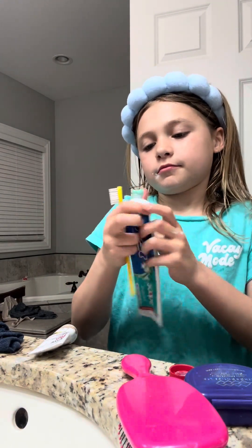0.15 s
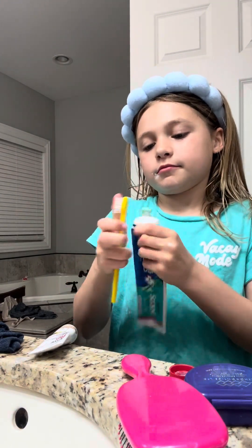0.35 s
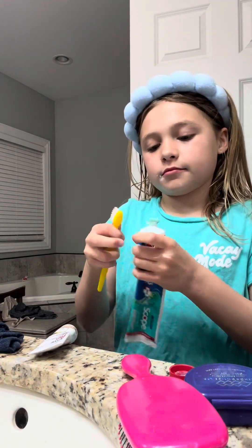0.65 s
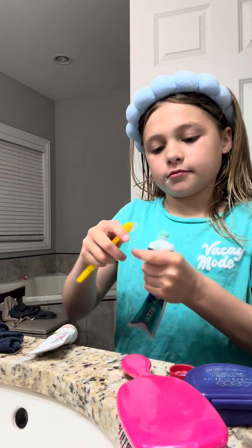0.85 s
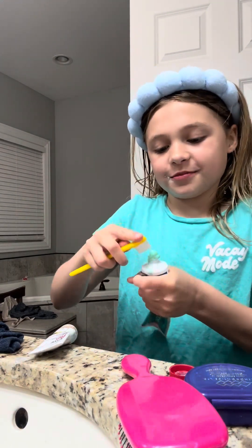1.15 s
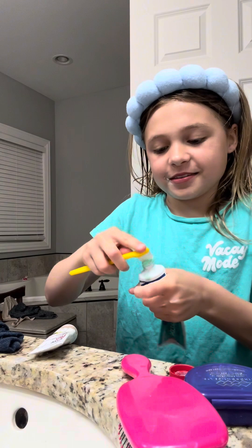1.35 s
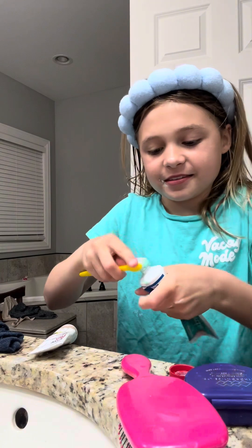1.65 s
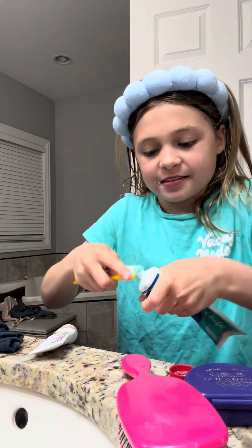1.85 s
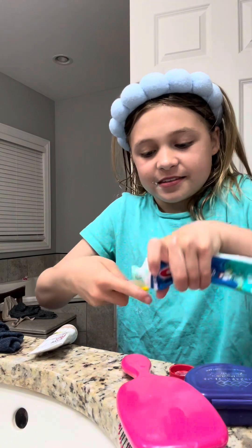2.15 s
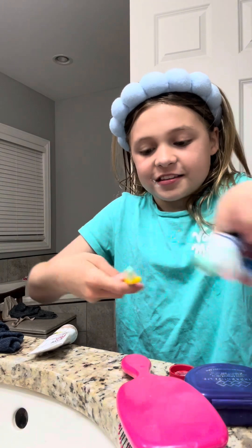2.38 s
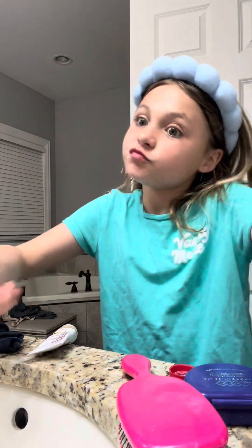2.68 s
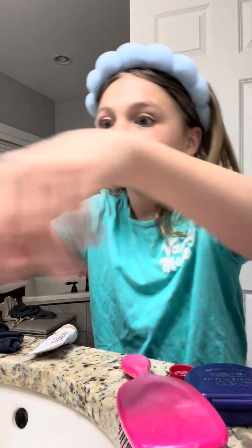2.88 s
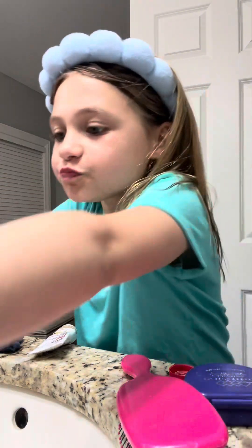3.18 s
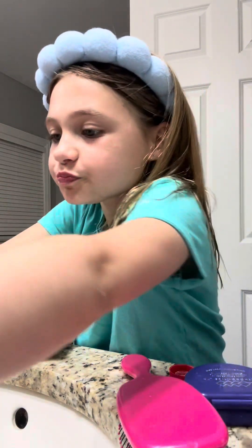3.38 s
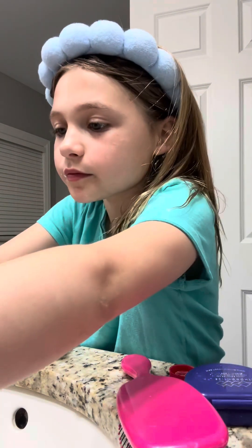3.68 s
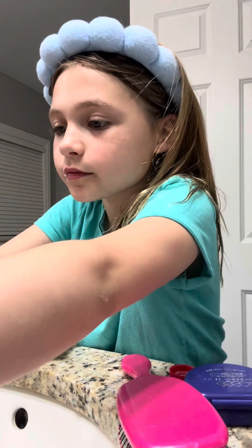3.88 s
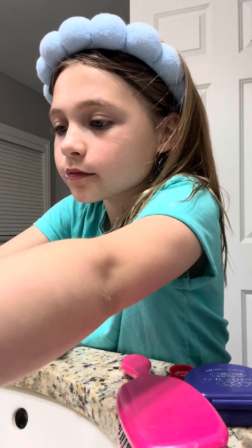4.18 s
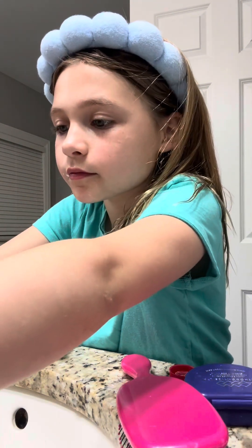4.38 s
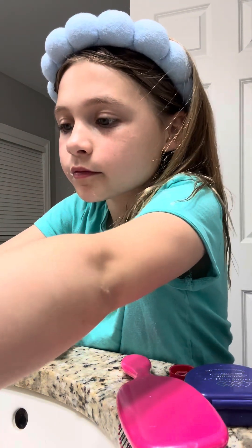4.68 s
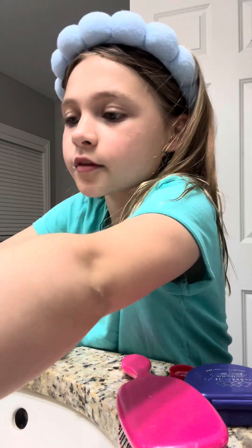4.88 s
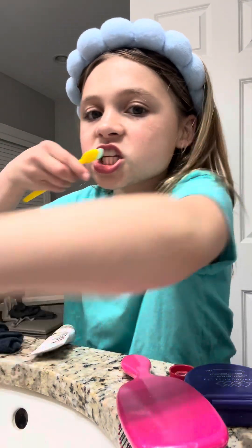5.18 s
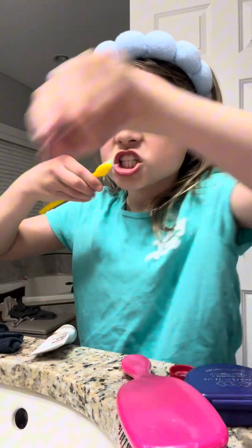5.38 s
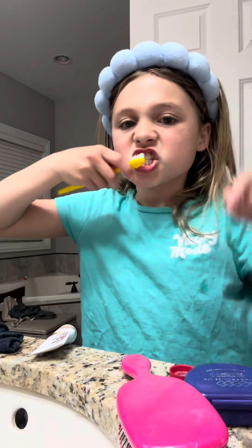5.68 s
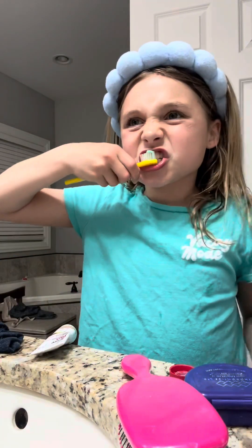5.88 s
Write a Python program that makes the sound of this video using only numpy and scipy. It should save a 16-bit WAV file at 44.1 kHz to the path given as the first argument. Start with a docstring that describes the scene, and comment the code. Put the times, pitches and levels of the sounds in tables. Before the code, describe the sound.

Faint plastic rustles and ticks, a heavy tube drop with rattling bounces, a short hissing tap burst, handle clunk, drips and a first toothbrush scrape.

```python
"""Tube dropped in a bathroom

A small hard bathroom with a humming fan, heard through the two ports of a microphone. Fingers rustle and tick on
a plastic tube: grains and gliding bands of noise, short pings. The tube drops on the stone counter and clatters to
rest: bursts of force ring its modes over low booms. A tap runs for a moment as coloured noise into a drain that
gulps on two tones; it is shut and drips, and a brush meets the teeth in bright grains."""
import sys
import numpy as np
from scipy import signal
from scipy.fft import rfft, irfft
from scipy.io import wavfile

SR = 44100
rng = np.random.default_rng(int(sys.argv[2]) if len(sys.argv) > 2 else 0)


def wav_record(signal):
    """Record a signal, one row per channel, as 16-bit PCM in the file named by sys.argv[1]."""
    frames = np.transpose(np.atleast_2d(signal))
    bounded = np.clip(frames, -1, 1)
    # unit amplitude maps onto the largest positive 16-bit level
    quanta = np.round(bounded * 32767).astype(np.int16)
    wavfile.write(sys.argv[1], SR, quanta)


N = 265923
HZ = np.maximum(np.fft.rfftfreq(N, 1 / SR), 1)
TIME = np.arange(N) / SR

# In all spectra and mode lists the levels are relative to each other unless noted.
# broad fan air: pitch_hz, density_db (per Hz)
FAN_AIR = [(35, 4), (55, -7.5), (120, -9), (160, -14), (205, -16), (260, -15.5), (340, -9), (420, -16.5),
           (560, -25.5), (820, -29.5), (1200, -30), (2000, -40.5), (6000, -53.5), (9000, -74.5)]
# loudness of the fan air: start_s, level_db
FAN_AIR_LEVEL = [(0, -53.5), (2.4, -54.5), (3.2, -50.5), (6.03, -54.5)]
# wavering fan lines: pitch_hz, width_hz, level_db
FAN_HUM = [(60, 2.416, -60.5), (123, 3, -70), (204.6, 8, -67), (362.7, 19, -63.5), (588, 6.6, -81)]
# how the ports hear the fan, rustles, brush and hiss, three lists:
# pitch_hz, left_right_db / pitch_hz, likeness (0 to 1) / pitch_hz, left_lead_rad
AIR_PORTS = ([(60, -1), (150, -6), (350, -8), (650, -1), (1400, -5), (3200, -9), (7000, -4), (13000, 0)],
             [(60, .85), (150, .6), (350, .7), (700, .4), (1400, .2), (3000, .3), (7000, .5), (13000, .5)],
             [(50, -1.3), (200, -1.1), (350, -.2), (700, -.6), (1400, .8), (3000, 2.8), (7000, -.3),
             (13000, 1.1)])

# rustles and rubs of hands and tube, and fizz after bright ticks: start_s, length_s, cloth_db, rub_db
RUSTLES_AND_RUBS = [(0.0, 0.07, -86, -80), (0.166, 0.037, -83.5, -78), (0.26, 0.21, -102, -78),
                    (0.324, 0.11, -74.5, -77.5), (0.543, 0.15, -96, -75.5), (0.63, 0.063, -81, -78),
                    (0.784, .005, -79.5, -80), (0.85, 0.055, -99, -79), (1.057, 0.021, -77, -73),
                    (1.129, 0.022, -74, -87), (1.452, 0.023, -77, -87), (1.423, 0.13, -104, -84),
                    (1.855, 0.083, -87, -78), (2.226, 0.13, -92, -88), (2.342, 0.034, -65.5, -75),
                    (2.436, 0.037, -57.5, -65.5), (2.547, 0.37, -65, -60), (2.72, 0.056, -58, -56.5),
                    (2.844, 0.11, -71, -65.5), (3.006, 0.088, -68.5, -64), (3.115, 0.15, -79, -72),
                    (4.759, 0.037, -58, -76), (4.805, 0.031, -76, -74), (4.837, 0.03, -57, -98),
                    (4.9, 0.043, -59.5, -98.5), (4.982, 0.037, -70.5, -103), (5.772, 0.096, -84.5, -84.5)]
# spectrum of the cloth-like rustle: pitch_hz, density_db (per Hz)
CLOTH_SPECTRUM = [(2940, -31), (5000, -16), (5460, -13), (7860, -3), (9320, -5.5), (10100, -25), (13600, 0),
                  (16000, -28)]
# tube wall under a finger: pitch_hz, width_hz, level_db
RUBBED_WALL = [(1720, 760, 4.5), (2820, 760, 2.5), (3500, 960, -2.5), (4600, 2400, 1.5), (6300, 1100, -8.5)]
CLOTH_RISE_DB_PER_S, CLOTH_FALL_DB_PER_S = 3000, 299.5
RUB_RISE_DB_PER_S, RUB_FALL_DB_PER_S = 403.5, 197.5
# a finger sliding along the tube wakes one band of its wall: start_s, length_s, from_hz, to_hz, level_db
FINGER_SLIDES = [(0.173, .05, 1900, 1900, -77.5), (0.238, .07, 2776, 2665, -70),
                 (0.306, 0.21, 2540, 2785, -72.5), (.32, 0.12, 6400, 6200, -78),
                 (0.327, 0.025, 7500, 7600, -77), (0.341, 0.18, 4780, 4600, -74.5),
                 (.36, .015, 7400, 8000, -87), (.55, .15, 4700, 4400, -87), (0.858, 0.05, 4230, 4500, -84),
                 (1.06, 0.031, 2960, 2800, -90), (1.435, 0.11, 4500, 4600, -86),
                 (1.471, 0.097, 2830, 2730, -81.5)]
SLIDE_WIDTH_HZ = 330

# dull thuds through the counter: start_s, boom_db, boom_hz, knock_db, decay_s
COUNTER_THUDS = [(0.236, -37, 60, -57, 0.014), (2.445, -16, 75.4, -21, 0.035),
                 (2.502, -33, 151, -69, 0.015), (2.602, -40.5, 338, -27, 0.12),
                 (2.612, -22.5, 71.5, -55, 0.029), (2.682, -35.5, 133, -39, 0.024),
                 (2.726, -27, 174, -34.5, 0.02), (2.758, -38, 127.4, -39.5, 0.079),
                 (2.852, -43.5, 338, -43.5, 0.0292), (2.889, -33, 100, -45.5, 0.041),
                 (3.103, -43.5, 130.2, -52.5, 0.09), (3.249, -46.5, 71.4, -74, 0.04),
                 (3.36, -45.5, 60, -64.5, 0.035), (3.668, -34, 123, -64, 0.016),
                 (4.06, -45, 120.4, -75, 0.024), (4.775, -45, 334, -70, 0.012),
                 (4.798, -27.5, 119, -67, 0.043), (4.814, -39, 258, -42, 0.035),
                 (4.857, -38.5, 147.7, -54, 0.029)]
# modes of the counter top: pitch_hz, level_db, t60_s
COUNTER_MODES = [(374, -20.5, 0.021), (407, -4, 0.11), (490, 7.5, 0.022), (693.4, -6.5, 0.067),
                 (910, -5, 0.017), (1560, -13, 0.038), (1900, -15, 0.04)]
# loose things shaking with each boom: pitch_hz, density_db (per Hz)
RUMBLE_SPECTRUM = [(40, -16.5), (80, 6.5), (250, -4.5), (400, -8.5), (700, -30.5), (2500, -38.5),
                   (6000, -60)]
RUMBLE_DB = -6.5  # rms beside a boom tone of height 1
BOOM_LAG_S = .006  # the boom begins this long after the listed time of the thud
BOOM_SWELL_CYCLES, BOOM_FALL_POWER = 1.3, 1.2  # a power above 1: the boom holds, then drops

# small ticks of fingers, drops and brush: start_s, peak_db, pitch_hz, treble_edge_db (beside the ping), ring_cycles
SMALL_TICKS = [(0.676, -47.5, 836, -30, 2.7), (0.675, -54, 1900, -30, 3.5), (0.7888, -60.5, 3380, -10, 18),
               (1.048, -54, 4600, -3, 10.6), (1.048, -53.5, 8000, -27, 30), (1.049, -56.5, 910, -28, 16),
               (1.4494, -59, 8400, -11, 9.4), (1.05, -51, 2310, -30, 2.5), (1.056, -51.5, 2800, -20, 3.8),
               (1.897, -64, 7000, 3, 1.4), (2.304, -53.5, 8400, -14, 16), (2.3421, -41.5, 8000, -12, 11),
               (2.342, -54.5, 2970, -28, 12), (2.427, -49.5, 2550, -22, 6.3), (2.5394, -37, 7590, -12, 4.6),
               (3.8072, -51.5, 3840, 7, 27), (3.889, -58.5, 3800, -20, 18), (3.804, -47, 5700, 3, 10),
               (3.8888, -34.5, 8000, 2, 8.5), (3.951, -55, 2730, -5, 26), (4.629, -51, 5900, -15, 11),
               (4.69, -52.5, 9080, 10.5, 5), (4.74, -57.5, 8580, 1, 8.4), (4.7616, -37.5, 8860, -3, 25),
               (4.771, -42, 8350, -9, 9.9), (4.772, -59, 5100, -20, 13), (4.786, -60.5, 6100, -20, 12),
               (4.823, -62.5, 3960, -18, 18), (4.8424, -31, 7980, -5, 17), (4.9037, -31.5, 8120, -8, 11),
               (4.9462, -57, 3500, -10, 26), (4.977, -61.5, 5200, 6.5, 19), (5.024, -68, 5050, -17, 16),
               (5.0756, -57, 7890, -3, 7.5), (5.098, -63, 8000, 2, 5.9), (5.842, -60.5, 1714, -21, 7.9),
               (5.8622, -63, 7460, -2, 5), (5.9698, -36, 7140, -15, 16)]
# side a tick is heard on, by pitch: pitch_hz, left_right_db
TICK_PAN = [(800, -8), (1800, -15), (3500, -19.5), (5200, -25), (7000, -15), (9000, 3)]
TICK_EDGE_HZ = 13500

# tube on the counter, force felt by each part and the pitch each spot favours:
# start_s, body_db, wall_db, cap_db, wall_hz, cap_hz
TUBE_BOUNCES = [(2.442, -51.5, -44.5, -48.5, 2200, 5900), (2.5674, -23, -66, -55.5, 3200, 6600),
                (2.571, -36.5, -38, -27, 3700, 5700), (2.6005, -4, -43, -38.5, 2200, 8000),
                (2.6119, -44.5, -52, -32.5, 5150, 8000), (2.617, -46, -48.5, -49.5, 3650, 7300),
                (2.618, -48, -57.5, -43.5, 4470, 6610), (2.656, -55.5, -44.5, -35, 2730, 5900),
                (2.681, -41, -45.5, -38, 3670, 6300), (2.7242, -21, -53, -36.5, 3950, 6860),
                (2.7399, -28, -49, -37, 2727, 5900), (2.762, -37, -48.5, -54.5, 2400, 8300),
                (2.851, -27, -40, -63, 3240, 6300), (2.863, -29.5, -88, -41.5, 2205, 6370),
                (2.887, -37.5, -103, -67, 2200, 6600), (3.033, -33, -50, -46.5, 2170, 5960),
                (3.092, -43, -64, -88, 3180, 6580)]
# modes of the tube's body, then wall, then cap: pitch_hz, level_db, t60_s
TUBE_BODY = [(900, -19, 0.035), (1115, -1, 0.009), (1180, -8.5, 0.00077), (1264, -10, 0.027),
             (1510, -10, 0.013), (1840, -8, 0.013)]
TUBE_WALL = [(2200, -5, 0.0044), (2730, -2, 0.006), (3200, 0.5, 0.0039), (3650, -1.5, 0.0056),
             (4400, -1, 0.0047), (5150, 3, 0.0055)]
TUBE_CAP = [(5900, -8, .003), (6600, -5, 0.002), (7300, -3.5, 0.0033), (8000, 1, 0.0029),
            (9170, 2.5, 0.0027), (11400, -1.5, .002), (13600, 1.5, .002), (15200, -9, .002)]
RING_DELAY_S = .0015  # the ringing of a blow begins this long after its listed time
FAVOUR_DB, FAVOUR_OCTAVES = 11.5, 0.39  # lift of the modes near a favoured pitch
CHATTER_DECAY_S = .002
FIRST_TOUCH, LATER_TOUCHES = 1.9, .9  # sizes within the chatter of one bounce
# the tube shivers against the stone between bounces: start_s, length_s, level_db
TUBE_SHIVERS = [(2.474, 0.043, -61), (2.567, .05, -49), (2.63, 0.087, -56.5), (2.732, .04, -54.5),
                (2.854, .04, -65), (3.03, 0.02, -72)]
SHIVERS_PER_S, SHIVER_FALL_DB_PER_S = 300, 250.5
# how the ports hear the blows, two lists: pitch_hz, left_right_db / pitch_hz, left_lead_rad
HIT_PORTS = ([(60, 0), (150, -1), (350, 0), (650, 0), (1300, 2), (2200, -6), (4000, -11), (8000, -2),
             (13000, 0)], [(60, -.5), (150, -1.4), (690, -2.0), (1200, .3), (1550, .8), (2150, -2.4),
             (2500, -2.3), (5000, 4.7), (6500, 5.8), (8000, 7.6), (11200, 10.4), (13600, 14.5),
             (16000, 16)])

# water on the basin: pitch_hz, density_db (per Hz)
BASIN_SPECTRUM = [(350, -66), (600, -39.5), (650, -29), (910, -13.5), (1460, 0.5), (1790, -13),
                  (2110, -12.5), (3440, -25.5), (3730, -32), (5000, -21), (6500, -57), (11000, -120)]
# hiss of the aerator: pitch_hz, density_db (per Hz)
AERATOR_SPECTRUM = [(3000, -17.5), (4600, -16.5), (6900, -7.5), (8000, -4.5), (9500, 4), (10300, -68),
                    (11200, -2.5), (13600, -0.5), (14800, -1.5), (15800, -22), (16400, -28)]
# the tap's narrow wavering resonances: pitch_hz, width_hz, level_db
TAP_WHISTLES = [(1000, 32, -78), (1307, 25, -67.5), (1440, 60, -67.5), (1935, 46, -73), (2145, 40, -72.5),
                (2800, 23, -80.5), (6100, 49, -74), (6800, 70, -71.5), (7440, 50, -76), (8070, 71, -66.5),
                (8370, 29, -67.5), (9160, 51, -65), (12230, 92, -72), (13100, 72, -65), (13700, 110, -74)]
# how the ports hear the tap, three lists:
# pitch_hz, left_right_db / pitch_hz, likeness (0 to 1) / pitch_hz, left_lead_rad
TAP_PORTS = ([(60, 6), (130, 14), (290, 45), (640, -4), (1410, 9.5), (3100, -2.5), (6820, -4), (15000, 2)],
              [(700, 0.16), (1400, 0.054), (3000, 0.084), (7000, 0.23), (13000, 0.63)], [(700, -4.5),
              (1400, 1.93), (7000, 1.24), (13000, 0)])
TAP_OPEN_S, TAP_SHUT_S = 3.40, 4.576  # fully open from, until
WATER_DB, WATER_SWELL_DB_PER_S, WATER_FALL_DB_PER_S = -57.5, 218.5, 160
AERATOR_DB, AERATOR_SWELL_DB_PER_S, AERATOR_FALL_DB_PER_S = -53, 622, 165  # level as the tap is fully open
AERATOR_SAG_DB_PER_S = 1
WHISTLE_FALL_DB_PER_S, WHISTLE_FLICKER_DB = 350, 4
WHISTLE_WANDER, WHISTLE_SAG_PER_S = 0.0091, .015  # shares of pitch

# gulps of the drain as water first reaches it: start_s, length_s, low_tone_db, high_tone_db
DRAIN_GULPS = [(3.663, 0.069, -52, -52.5), (3.8, 0.0043, -42.5, -43.5), (3.842, 0.062, -45.5, -58),
               (3.943, 0.0027, -70, -39), (4.02, 0.033, -54.5, -53)]
DRAIN_LOW_HZ, DRAIN_HIGH_HZ = 209, 335
GULP_RISE_S, GULP_FALL_DB_PER_S = .01, 400  # the rise covers 20 dB

# modes of the tap handle: pitch_hz, level_db, t60_s
HANDLE_MODES = [(334, -3, 0.025), (551, 5.5, 0.027), (997, -2.5, 0.025), (1260, -3, 0.012),
                (1485, -7, 0.02)]
HANDLE_STOP_S, HANDLE_STOP_DB = 4.794, -36.5  # the handle meets its stop

# bands of the bristles: pitch_hz, width_hz, level_db
BRISTLE_BANDS = [(4500, 1200, -13), (6800, 1600, 1), (8300, 1250, -6), (11670, 1500, -10)]
BRUSH_S, BRUSH_DB = 5.972, -66  # bristles start to scrub

# tails of the bathroom: pitch_hz, t60_s, level_db
ROOM_TAILS = [(100, 0.8, -9), (376, 0.54, -9.5), (1300, 0.21, -5.5), (3500, 0.33, -4), (8000, 0.48, -12),
              (13000, 0.274, -32.5)]
TICK_WET_DB = -8  # send of ticks and handle to the room

# steady microphone hiss: pitch_hz, density_db (per Hz)
MIC_HISS = [(2350, -35.5), (4000, -18), (8650, -4.5), (10600, -23), (11300, -11), (13700, 1),
            (15100, -16.5), (16000, -28)]
MIC_HISS_DB = -85
MONO_FROM_S, MONO_BELOW_HZ = 3.0, 342
BASS_CUT_HZ, CUTOFF_HZ = 42, 16900


def from_db(db):
    """Amplitude ratio of a level in dB."""
    return 10 ** (np.asarray(db) / 20)


def rms_one(x):
    """The same sound at rms 1."""
    return x / np.sqrt(np.mean(x ** 2) + 1e-20)


def at_hz(points, hz=HZ, axis=1):
    """A column joined by straight lines over log frequency."""
    points = np.array(points)
    return np.interp(np.log(hz), np.log(points[:, 0]), points[:, axis])


def drift(rate_hz):
    """Slow chance of spread 1; slow rates are drawn at every 16th sample."""
    step = 16 if rate_hz < 60 else 1
    r = np.exp(-2 * np.pi * rate_hz * step / SR)
    noise = rng.standard_normal((N + SR) // step + 2)
    slow = signal.lfilter([1], [1, -2 * r, r * r], noise)[SR // step:]  # the filter's start-up is dropped
    return np.interp(np.arange(N) / step, np.arange(len(slow)), rms_one(slow))


def hold(start, length, rise_db_per_s, fall_db_per_s):
    """Gain that swells up to the start, holds and dies away; silent below -60 dB."""
    rise_db = rise_db_per_s * (TIME - start)
    fall_db = fall_db_per_s * (start + length - TIME)
    db = np.minimum(0, np.minimum(rise_db, fall_db))
    gain, heard = np.zeros(N), db > -60
    gain[heard] = from_db(db[heard])
    return gain


def ring(clicks, hz, t60):
    """A unit click sets a sine of starting height 1 ringing, down 60 dB after t60 seconds."""
    r, w = from_db(-60 / (t60 * SR)), 2 * np.pi * hz / SR
    return signal.lfilter([0, np.sin(w)], [1, -2 * r * np.cos(w), r * r], clicks + 1e-18)


def double_ring(force, hz, t60):
    """Twice through one resonance: a soft, compact ping that swells before it dies; peak 1."""
    ping = ring(ring(force, hz, t60), hz, t60)
    return ping / np.abs(ping).max()


def humps(peaks):
    """Gain over frequency of a sum of resonances, whose total levels stand as listed."""
    return np.sqrt(sum(from_db(2 * db) / width / (1 + (2 * (HZ - hz) / width) ** 2) ** 2
                       for hz, width, db in peaks))


def at_ports(x, balance, lead):
    """One sound as the left and right port hear it, apart in level and phase."""
    tilt = from_db(at_hz(balance) / 2) * np.exp(.5j * at_hz(lead))
    return irfft(rfft(x) * np.array([tilt, 1 / tilt]), N)


def port_noise(gain, ports, source=None):
    """Coloured noise, partly shared by the ports; rms 1."""
    balance, likeness, lead = ports
    shared = rng.standard_normal(N) if source is None else source
    alike = np.clip(at_hz(likeness), 0, 1)
    tilt = from_db(np.outer([.5, -.5], at_hz(balance)))
    own = rfft(rng.standard_normal((2, N))) * np.sqrt(1 - alike) * tilt
    common = np.sqrt(alike) * rfft(at_ports(shared, balance, lead))
    return rms_one(irfft(gain * (common + own), N))


def band_noise(hz, width_hz):
    """A narrow band of noise around a centre that may move."""
    turn = 2 * np.pi * np.cumsum(hz * np.ones(N)) / SR
    return drift(width_hz) * np.cos(turn) + drift(width_hz) * np.sin(turn)


def grains(per_s, spread_db):
    """Random clicks of uneven size; rms 1."""
    sizes = from_db(spread_db * np.minimum(rng.exponential(1, N), 5)) * rng.choice([-1, 1], N)
    return rms_one(sizes * (rng.random(N) < per_s / SR))


def strike(modes, times, levels_db, contacts, favoured_hz=None):
    """Each contact, a short burst of force, rings every mode with a strength of its own."""
    out, luck_db = np.zeros(N), rng.normal(0, 1.2, (len(times), len(modes)))
    if favoured_hz is not None:
        octaves = np.log2(np.array(modes)[:, 0] / favoured_hz[:, None])
        luck_db = luck_db + FAVOUR_DB * np.exp(-(octaves / FAVOUR_OCTAVES) ** 2)
    for k, (hz, db, t60) in enumerate(modes):
        force = np.zeros(N)
        for s, level_db, contact, chance_db in zip(times, levels_db, contacts, luck_db[:, k]):
            i = round((s + RING_DELAY_S) * SR)
            force[i:i + len(contact)] += from_db(level_db + db + chance_db) * contact[:N - i]
        sign = 1 if favoured_hz is None else (-1) ** k  # neighbouring modes of wall and cap in opposite sense
        out += sign * ring(force, hz, t60)
    return out


def fan():
    """Broad air noise and hum lines that waver because each is a narrow band of noise."""
    hum_level = np.sqrt(np.sum(from_db(2 * np.array(FAN_HUM)[:, 2])))
    hum = hum_level * port_noise(humps(FAN_HUM), AIR_PORTS)
    air_db = np.interp(TIME, *np.transpose(FAN_AIR_LEVEL))
    return from_db(air_db) * port_noise(from_db(at_hz(FAN_AIR)), AIR_PORTS) + hum


def rustle():
    """Dense soft grains for rustle, rattle and fizz, and a dull rub coloured by the tube wall."""
    cloth_gain = sum(from_db(db) * hold(s, length, CLOTH_RISE_DB_PER_S, CLOTH_FALL_DB_PER_S)
                     for s, length, db, _ in RUSTLES_AND_RUBS)
    rub_gain = sum(from_db(db) * hold(s, length, RUB_RISE_DB_PER_S, RUB_FALL_DB_PER_S)
                   for s, length, _, db in RUSTLES_AND_RUBS)
    flutter = from_db(3.9 * drift(54))
    cloth = port_noise(from_db(at_hz(CLOTH_SPECTRUM)), AIR_PORTS, grains(4100, 1.5))
    rub = port_noise(humps(RUBBED_WALL), AIR_PORTS, grains(2500, 4.0))
    return cloth_gain * flutter * cloth + at_ports(slides(), *AIR_PORTS[::2]) + rub_gain * rub


def slides():
    """A finger along the wall: a soft band of noise that glides while the finger moves."""
    out = np.zeros(N)
    for s, length, from_hz, to_hz, db in FINGER_SLIDES:
        glide_hz = np.interp(TIME, [s, s + length], [from_hz, to_hz])
        gain = from_db(db) * hold(s, length, RUB_RISE_DB_PER_S, RUB_FALL_DB_PER_S)
        out += gain * band_noise(glide_hz, SLIDE_WIDTH_HZ)
    return out


def thuds():
    """A low, lumpy boom that swells and dies, a rumble along with it and a knock of the counter top."""
    s, boom_db, hz, knock_db, decay_s = np.transpose(COUNTER_THUDS)
    shaking = rfft(grains(1200, 2.0)) * from_db(at_hz(RUMBLE_SPECTRUM))
    rumble = from_db(RUMBLE_DB) * rms_one(irfft(shaking, N))
    booms = np.zeros(N)
    for start, level_db, boom_hz, fall_s in zip(s, boom_db, hz, decay_s):
        t = np.maximum(TIME - start - BOOM_LAG_S, 0)
        swell = 1 - np.exp(-t * boom_hz / BOOM_SWELL_CYCLES)
        fall = np.exp(-(t / max(fall_s, .005)) ** BOOM_FALL_POWER)
        booms += from_db(level_db) * swell * fall * (np.sin(2 * np.pi * boom_hz * t) + rumble)
    contact = np.hanning(20) / 10
    knocks = strike(COUNTER_MODES, s, knock_db, [contact] * len(s))
    lumps = from_db(1.0 * drift(40))
    return booms * lumps + knocks


def ticks():
    """A short ping that swells and dies on its own pitch, with a bright edge, placed left or right."""
    out, t = np.zeros((2, N)), np.arange(900) / SR
    chatter = rng.standard_normal((len(SMALL_TICKS), 900)) * np.exp(-t / 0.004) * 0.035
    chatter[:, 0] = 1  # the first touch
    for (s, peak_db, hz, edge_db, cycles), force in zip(SMALL_TICKS, chatter):
        ping = double_ring(force, hz, max(cycles, 1) / hz)
        ping = ping + from_db(edge_db) * double_ring(force, TICK_EDGE_HZ, 0.0013)
        sides_db = peak_db + np.array([[.5], [-.5]]) * at_hz(TICK_PAN, hz)
        i = round(s * SR)
        out[:, i:i + 900] += (from_db(sides_db) * ping)[:, :N - i]
    return out


def clatter():
    """Each bounce flexes the body to and fro; wall and cap feel a swelling, dying chatter of small touches."""
    s, body_db, wall_db, cap_db, wall_hz, cap_hz = np.transpose(TUBE_BOUNCES)
    t = np.arange(600) / SR
    envelope = np.exp(-t / CHATTER_DECAY_S) * (1 - np.exp(-t / 0.00014))
    chatter = LATER_TOUCHES * rng.standard_normal((len(s), 600)) * envelope + FIRST_TOUCH * (t == 0)
    flex = np.hanning(60) * np.sin(2 * np.pi * 1200 * t[:60]) / 15
    body = strike(TUBE_BODY, s, body_db, [flex] * len(s))
    wall = strike(TUBE_WALL, s, wall_db, chatter, wall_hz)
    cap = strike(TUBE_CAP, s, cap_db, chatter, cap_hz)
    return body + wall + cap


def shivers():
    """Sparse uneven touches against the stone, each dealt to one mode of the tube."""
    modes = TUBE_BODY + TUBE_WALL + TUBE_CAP[:5]
    touches, dealt = grains(SHIVERS_PER_S, 7.1), rng.integers(0, len(modes), N)
    rings = rms_one(sum(from_db(db) * ring(touches * (dealt == k), hz, t60)
                        for k, (hz, db, t60) in enumerate(modes)))
    gain = sum(from_db(db) * hold(s, length, CLOTH_RISE_DB_PER_S, SHIVER_FALL_DB_PER_S)
               for s, length, db in TUBE_SHIVERS)
    return rings * gain


def tap():
    """Water patters on the basin; the aerator hisses in patches that come and go, with faint whistles."""
    running = TAP_SHUT_S - TAP_OPEN_S
    water_gain = from_db(WATER_DB) * hold(TAP_OPEN_S, running, WATER_SWELL_DB_PER_S, WATER_FALL_DB_PER_S)
    aerator_db = AERATOR_DB - AERATOR_SAG_DB_PER_S * (TIME - TAP_OPEN_S)
    aerator_gain = from_db(aerator_db) * hold(TAP_OPEN_S, running, AERATOR_SWELL_DB_PER_S, AERATOR_FALL_DB_PER_S)
    whistle_gain = hold(TAP_OPEN_S, running, AERATOR_SWELL_DB_PER_S, WHISTLE_FALL_DB_PER_S)
    patter = port_noise(from_db(at_hz(BASIN_SPECTRUM)), TAP_PORTS, grains(3300, 3.0))
    spectrum = rfft(port_noise(from_db(at_hz(AERATOR_SPECTRUM)), TAP_PORTS))
    ridges = whistle_gain * at_ports(whistles(), *TAP_PORTS[::2])
    # each of ten bands of the hiss flickers by itself
    band = np.digitize(HZ, np.geomspace(5000, 15000, 9))
    hiss = sum(irfft(spectrum * (band == k), N) * from_db(1.2 * drift(2.5)) for k in range(10))
    unsteady = from_db(.6 * drift(12.5))
    return unsteady * (water_gain * patter + aerator_gain * hiss + ridges)


def whistles():
    """Narrow resonances that wander and sink in pitch, and come and go."""
    sag = 1 - WHISTLE_SAG_PER_S * (TIME - (TAP_OPEN_S + TAP_SHUT_S) / 2)
    out = np.zeros(N)
    for hz, width_hz, db in TAP_WHISTLES:
        level = from_db(db + WHISTLE_FLICKER_DB * drift(5.0))
        out += level * band_noise(hz * (sag + WHISTLE_WANDER * drift(1.6)), width_hz)
    return out


def drain():
    """Each gulp sounds the two tones of the drain pipe, unsteady in level and pitch."""
    out = np.zeros(N)
    tones = []
    for hz in (DRAIN_LOW_HZ, DRAIN_HIGH_HZ):
        phase = 2 * np.pi * np.cumsum(hz * (1 + .015 * drift(15))) / SR
        tones.append(from_db(2.0 * drift(25)) * np.sin(phase))
    low, high = tones
    for s, length, low_db, high_db in DRAIN_GULPS:
        gulp = hold(s + GULP_RISE_S, length, 20 / GULP_RISE_S, GULP_FALL_DB_PER_S)
        out += gulp * np.sqrt(2) * (from_db(low_db) * low + from_db(high_db) * high)
    return out


def handle():
    """The tap handle is pressed into its stop: every mode swells over a few cycles and is damped by the hand."""
    press = np.zeros(N)
    press[round(HANDLE_STOP_S * SR)] = 1
    return sum(from_db(HANDLE_STOP_DB + db + 1.0 * rng.standard_normal()) * double_ring(press, hz, t60)
               for hz, db, t60 in HANDLE_MODES)


def brush():
    """Bristles flick over the teeth as dense bright grains."""
    stroke = from_db(BRUSH_DB) * hold(BRUSH_S, 1, CLOTH_RISE_DB_PER_S, CLOTH_FALL_DB_PER_S)
    return stroke * port_noise(humps(BRISTLE_BANDS), AIR_PORTS, grains(2500, 3.5))


def bathroom(x):
    """Hard walls answer with tails of noise that die band by band, unlike in the two ports."""
    t, tail = np.arange(SR // 2) / SR, 0
    edges = 45 * 2 ** np.arange(0, 9.0)  # octaves
    for low, high in zip(edges, np.minimum(edges * 2, .45 * SR)):
        hz = np.sqrt(low * high)
        octave = signal.butter(2, [low, high], "band", fs=SR, output="sos")
        band = signal.sosfilt(octave, rng.standard_normal((2, len(t))))
        fade = from_db(-60 * t / at_hz(ROOM_TAILS, hz)) * (1 - np.exp(-t / 0.0004))
        level = from_db(at_hz(ROOM_TAILS, hz, axis=2)) / np.sqrt(np.sum(fade ** 2))
        tail = tail + band * fade * level
    return signal.fftconvolve(x, tail, axes=1)[:, :N]


def scene():
    """Blows and pings sound direct and through the room; tap, rustle, brush and fan sound direct only."""
    blows = at_ports(clatter() + shivers() + thuds() + drain(), *HIT_PORTS)
    pings = ticks() + at_ports(handle(), *HIT_PORTS)
    room = bathroom(blows + from_db(TICK_WET_DB) * pings)
    return blows + pings + room + tap() + rustle() + brush() + fan()


def record(dry):
    """The microphone adds a steady hiss; the bass turns mono part way through; deep bass and the top are cut."""
    left, right = dry + from_db(MIC_HISS_DB) * port_noise(from_db(at_hz(MIC_HISS)), AIR_PORTS)
    low_apart = irfft(rfft(left - right) / (1 + (HZ / MONO_BELOW_HZ) ** 6), N)
    mono = np.clip((TIME - MONO_FROM_S) / 0.018, 0, 1)
    left = left - mono * low_apart  # the left bass becomes that of the right
    bass_cut = signal.butter(6, BASS_CUT_HZ, "high", fs=SR, output="sos")
    top_cut = signal.cheby2(12, 70, CUTOFF_HZ, fs=SR, output="sos")
    return signal.sosfilt(top_cut, signal.sosfilt(bass_cut, np.array([left, right])))


dry = scene()
out = record(dry)
wav_record(out)
```